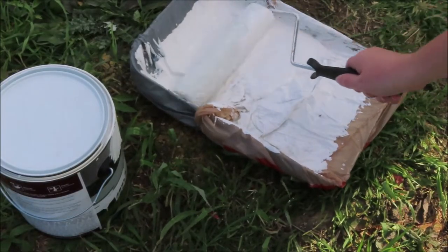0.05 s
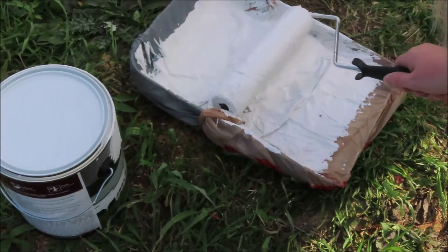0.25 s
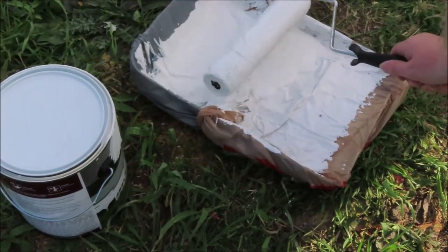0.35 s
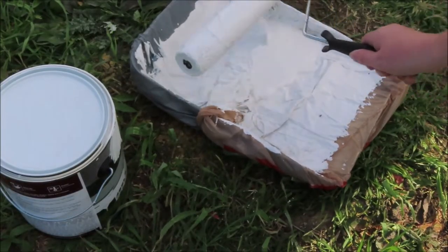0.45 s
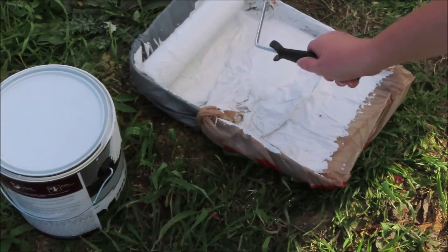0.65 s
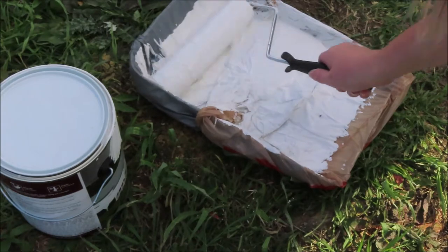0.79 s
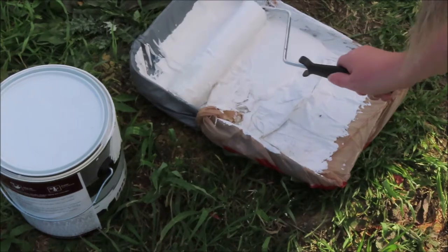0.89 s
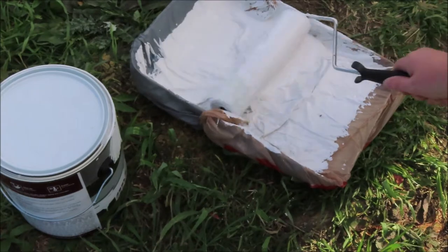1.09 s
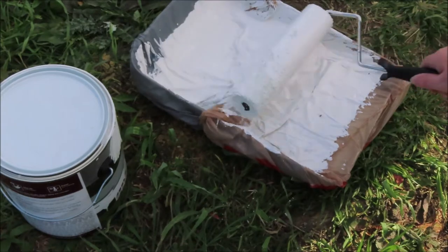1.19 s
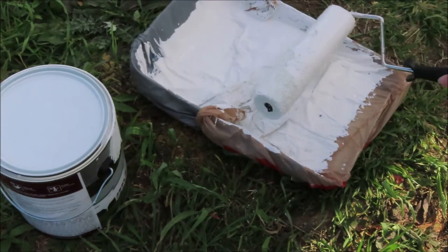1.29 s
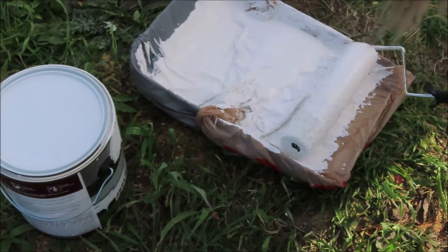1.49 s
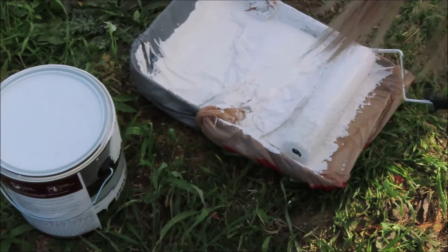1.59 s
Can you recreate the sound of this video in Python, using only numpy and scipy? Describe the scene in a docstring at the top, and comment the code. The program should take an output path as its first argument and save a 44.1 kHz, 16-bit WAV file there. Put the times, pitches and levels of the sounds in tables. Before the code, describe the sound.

A paint roller moves through wet paint in a tray, starting with a sticky sizzle and small snaps. Dull thuds come around 0.4 seconds as the sizzle drops away. The wet crackle and squelches return from 0.7 to 1.3 seconds, with the strongest bumps between 0.8 and 1.0. Another bump and squelch follow near 1.5. An uneven low rumble and faint distant outdoor roar lie underneath.

```python
"""On a lawn, about a metre away, a paint roller is worked back and forth in a lined tray of wet paint.
Sticky paint peels off the roller's fuzzy cover: tiny threads and bubbles break in a fine sizzle, with
squelches and a few snaps. The roller bumps over the tray's ribs, and its floor gives short, dull thuds.
Underneath lie a low rumble, a faint distant roar and a thin trill."""
import sys
import numpy as np
from scipy import signal
from scipy.fft import rfft, irfft, next_fast_len
from scipy.io import wavfile
from scipy.ndimage import uniform_filter1d

SR = 44100
rng = np.random.default_rng(int(sys.argv[2]) if len(sys.argv) > 2 else 0)


def persist_wave(psi):
    """Save psi, clipped to +-1, as 16-bit WAV."""
    counts = np.round(np.clip(psi, -1, 1) * 32767).astype(np.int16)
    wavfile.write(sys.argv[1], SR, np.atleast_2d(counts).T)


N = 72765

# how hard the paint peels off the roller (t/s, level/dB)
PEEL_LEVEL = [(0, -50), (0.054, -48), (0.066, -52.5), (0.21, -55.5), (0.26, -62), (0.31, -52.5),
              (0.35, -59), (0.41, -71), (0.64, -72), (0.672, -55.5), (0.694, -57), (0.72, -48.5),
              (0.735, -52), (0.762, -60.5), (0.822, -53), (0.885, -51), (0.9, -51), (1.04, -54.5),
              (1.152, -55), (1.212, -59.5), (1.262, -52), (1.303, -52), (1.333, -66.5), (1.52, -66),
              (1.552, -49.5), (1.585, -57.5), (1.63, -62)]
# treble added to or taken from the sizzle (t/s, level/dB)
SIZZLE_TREBLE = [(0, 0), (0.08, -5), (0.19, 7), (0.32, 2.5), (0.55, -1), (0.7, 7.5), (0.79, 5.5), (0.85, 5),
                 (0.98, -9), (1.044, -1), (1.056, 6), (1.16, 4.5), (1.29, 3.5), (1.45, -9), (1.56, -1.5),
                 (1.65, 0.5)]
# tone of the sizzle: how strong each frequency is (f/Hz, level/dB)
SIZZLE_TONE = [(300, -13.5), (600, -0.5), (1200, -1.5), (2100, -1), (2600, -2), (3050, -5.5), (4200, -6),
               (5200, -8.5), (7500, -13), (11500, -18), (15500, -26)]
# tone of the bright ticks of thicker threads (f/Hz, level/dB)
TICK_TONE = [(1000, -3), (8000, -8), (13000, -1), (15500, -7)]
# larger paint strings and bubbles snapping (t/s, level/dB)
SNAPS = [(0.0224, -36), (0.0328, -38), (0.0493, -32.5), (0.472, -52), (0.671, -41.5), (0.706, -41),
         (0.7194, -36), (0.735, -40), (0.7813, -42.5), (0.8022, -44), (0.8825, -38), (1.5786, -41.5)]
# tone of a snap (f/Hz, level/dB), and how fast it fades
SNAP_TONE, SNAP_FALL_S = [(400, 9), (1500, 9), (5000, 6), (11000, 1), (15500, -6)], 0.0016
# peaks of the squelches as the roller pulls out of the paint (t/s, level/dB)
SQUELCHES = [(0.05, -49.5), (0.721, -67), (0.826, -50), (0.886, -48), (1.288, -49.5), (1.556, -52.5)]
# stereo spread of the paint, which sits in the centre (f/Hz, level/dB)
PAINT_WIDTH = [(500, -37), (2000, -40), (4000, -17.5), (8000, -10.5), (13000, -6)]

# big bumps of the roller in the tray (t/s, level/dB, f/Hz)
BUMPS = [(0.081, -42, 146), (0.147, -44, 139), (0.2205, -39, 148), (0.236, -36, 159), (0.246, -35.5, 142),
         (0.257, -38, 175), (0.310, -40.5, 120), (0.389, -35, 174), (0.4045, -24.5, 220),
         (0.4177, -23.5, 223), (0.459, -29.5, 117), (0.469, -29, 171), (0.479, -36, 178),
         (0.499, -34.5, 121), (0.5655, -27.5, 162), (0.625, -29.5, 211), (0.633, -34, 96),
         (0.6583, -25, 148), (0.711, -28.5, 180), (0.7222, -32.5, 204), (0.778, -36.5, 226),
         (0.7915, -41, 310), (0.8238, -30.5, 255), (0.8395, -23, 318), (0.8495, -28.5, 278),
         (0.8579, -18, 296), (0.8732, -29, 334), (0.882, -25.5, 200), (0.9012, -24.5, 184),
         (0.9345, -31, 198), (0.9586, -29, 192), (0.968, -29.5, 322), (0.9988, -24.5, 226),
         (1.0255, -24.5, 187), (1.0313, -15, 299), (1.095, -35.5, 181), (1.1205, -38, 169),
         (1.422, -35.5, 198), (1.4732, -32, 198), (1.4877, -26, 256), (1.6394, -42.5, 202)]
# swings of the tray floor in a bump: body, main swing, upper ring (multiple of its pitch, level/dB)
FLOOR_SWINGS = [(0.55, -17.5), (0.998, 0), (1.8, -12)]
# strength of the small bumps between the big ones (t/s, level/dB)
JUDDER_LEVEL = [(0, -58), (0.19, -68), (0.225, -43.5), (0.29, -54), (0.36, -58), (0.41, -37), (0.44, -41.5),
                (0.52, -50), (0.68, -49), (0.8, -44), (0.86, -33.5), (0.92, -46.5), (1.03, -28.5),
                (1.06, -50.5), (1.2, -51.5), (1.31, -64), (1.5, -48.5), (1.65, -49.5)]
# notes the hollow tray rings at (f/Hz, level/dB), and how fast they fade
TRAY_NOTES, TRAY_RING_S = [(128, -12), (183, -16.5), (324, -12.5), (420, -8)], .014
# stereo spread of the bumps (f/Hz, level/dB)
BUMP_WIDTH = [(50, -42), (150, -44.5), (400, -17.5)]

# rise and fall of the deep rumble (t/s, level/dB)
RUMBLE_LEVEL = [(0, -55), (0.19, -71), (0.25, -47), (0.35, -52), (0.415, -35), (0.52, -44.5), (0.63, -41),
                (0.8, -66), (0.9, -38.5), (1.04, -54), (1.09, -57), (1.33, -73), (1.52, -55), (1.65, -59)]
# tone of the rumble (f/Hz, level/dB), and a shift of its whole level
RUMBLE_TONE, RUMBLE_DB = [(20, -25), (35, -7), (55, 0), (90, -1.5), (160, -15), (400, -70)], -2
# tone of the distant roar (f/Hz, level/dB)
ROAR_TONE = [(30, 0.5), (120, -2.5), (520, -5), (720, -1.5), (1000, -3), (1350, -6), (1700, -12.5),
             (2800, -19), (5200, -25.5), (9000, -34.5), (15000, -46)]
# rise and fall of the roar (t/s, level/dB)
ROAR_LEVEL = [(0, -53.5), (0.58, -52), (0.8, -52.5), (1.1, -55.5)]
# a hollow note in the roar, swelling and fading (t/s, level/dB)
HOLLOW_LEVEL = [(0, -68), (0.13, -62.5), (0.19, -54), (0.3, -52), (0.36, -60.5), (0.45, -54), (0.56, -70.5),
                (0.78, -51), (0.95, -70), (1.2, -66.5), (1.65, -74)]
# stereo spread of the roar, which is all around (f/Hz, level/dB)
ROAR_WIDTH = [(60, -46), (300, -26), (900, -20), (2000, -6.5), (4500, 3), (13000, 3.5)]

THREADS_PER_S, THREAD_SPREAD_DB = 9000, 2.5


def paint_sizzle(thread_db=-1.5, tick_db=-14, bubble_db=-6.5, hiss_db=-7.5, tuft_db=2):
    """Countless paint threads break as tiny clicks, mixed with brighter ticks, bubbles and hiss."""
    threads = gain(thread_db) * unit(shape_tone(clicks(THREADS_PER_S, THREAD_SPREAD_DB), SIZZLE_TONE))
    ticks = gain(tick_db) * unit(shape_tone(clicks(per_s=240, spread_db=3.5), TICK_TONE))
    sizzle = threads + ticks + gain(bubble_db) * bubbles() + gain(hiss_db) * noise(SIZZLE_TONE)
    treble = signal.sosfilt(signal.butter(1, 5600, "high", fs=SR, output="sos"), sizzle)
    sizzle += treble * (gain(curve(SIZZLE_TREBLE)) - 1)
    flutter_db = tuft_db * wobble(per_s=63)  # the fuzzy cover lets go tuft by tuft
    return sizzle * gain(curve(PEEL_LEVEL) + flutter_db)


def bubbles(per_s=450, low_hz=1684, high_hz=12700, ring_cycles=7.9):
    """Tiny bubbles burst, each ringing briefly at its own pitch; small, high ones are weaker."""
    t = np.arange(SR // 50) / SR
    out = np.zeros(N + SR)
    for when, pitch, chance in rng.random((int(per_s * N / SR), 3)):
        hz = low_hz * (high_hz / low_hz) ** pitch
        random_db = np.log(max(chance, np.exp(-3)))
        strength = gain(random_db) * (low_hz / hz) ** 0.21
        start = int(when * N)
        out[start:start + len(t)] += strength * np.exp(-t * hz / ring_cycles) * np.sin(2 * np.pi * hz * t)
    return unit(out[:N])


def paint_snaps():
    """Larger strings and bubbles snap, each with a wet crackle a few milliseconds long."""
    crackle = rng.standard_normal(N) * swells(SNAPS, rise_s=0.00061, fall_s=SNAP_FALL_S) / 2
    return shape_tone(crackle, SNAP_TONE)


def squelches():
    """Breaking threads make the wet gap under the roller ring, louder and louder until it lets go."""
    gap_ring = band(clicks(THREADS_PER_S, THREAD_SPREAD_DB), hz=2220, width_hz=1220)
    return gap_ring * swells(SQUELCHES, rise_s=0.02, fall_s=0.009)


def tray_bumps(top_hz=530, echo_s=0.0056):
    """The roller thuds over the tray's ribs; a faint echo from things nearby widens the sound."""
    knocks = thuds(BUMPS, FLOOR_SWINGS) + judder()
    low_pass = signal.butter(8, top_hz, fs=SR, output="sos")
    dull = signal.sosfiltfilt(low_pass, knocks + tray_ring(knocks))
    t = np.arange(SR // 20) / SR
    scatter = rng.standard_normal(len(t)) * np.exp(-t / echo_s)
    echo = signal.fftconvolve(dull, scatter / np.linalg.norm(scatter))[:N]
    return stereo(dull, echo, BUMP_WIDTH)


def thuds(bumps, swings, half_length_cycles=0.52, skew_radians=0.093):
    """At each bump the tray floor makes a slightly lopsided swing that stops almost at once."""
    out = np.zeros(N)
    for at, db, hz in bumps:
        centre = int(at * SR)
        span = np.arange(max(centre - SR // 20, 0), min(centre + SR // 20, N))
        for multiple, swing_db in swings:
            cycles = (span / SR - at) * hz * multiple
            hump = np.exp(-.5 * (cycles / half_length_cycles) ** 2)
            out[span] -= gain(db + swing_db) * hump * np.cos(2 * np.pi * cycles - skew_radians)
    return out


def judder(per_s=280, middle_hz=170, spread_octaves=0.66, octaves_per_db=0.11):
    """The roller shakes the tray with many small bumps as it rolls; harder shaking sounds higher."""
    when, size, pitch = rng.random((int(per_s * N / SR), 3)).T
    force_db = curve(JUDDER_LEVEL)
    extra_db = force_db[(when * N).astype(int)] - np.median(force_db)
    octaves = spread_octaves * (2 * pitch - 1) + octaves_per_db * extra_db
    bumps = zip(when * N / SR, 20 * np.log10(size), middle_hz * 2 ** octaves)
    shaking = thuds(bumps, swings=[(1, 0)])
    return unit(shaking - shaking.mean()) * gain(force_db)


def tray_ring(knocks):
    """The hollow tray rings on briefly after every knock."""
    t = np.arange(SR // 10) / SR
    notes = sum(gain(db) * np.cos(2 * np.pi * hz * t) for hz, db in TRAY_NOTES)
    ring = notes * np.exp(-t / TRAY_RING_S)
    scale = 2 / (TRAY_RING_S * SR)  # a note at 0 dB rings as strongly as it is pushed
    return signal.fftconvolve(knocks, ring * scale)[:N]


def rumble():
    """Wind or handling makes a deep, uneven rumble."""
    return noise(RUMBLE_TONE) * gain(curve(RUMBLE_LEVEL) + RUMBLE_DB)


def distant_roar():
    """A faint roar comes from all around, with a hollow note that swells and fades."""
    roar = stereo(noise(ROAR_TONE), noise(ROAR_TONE), ROAR_WIDTH)
    middle, side = (band(rng.standard_normal(N), hz=882, width_hz=172) for _ in range(2))
    hollow = stereo(middle, side, ROAR_WIDTH)
    return roar * gain(curve(ROAR_LEVEL)) + hollow * gain(curve(HOLLOW_LEVEL))


def trill(level_db=-77, flutter_db=5.5):
    """A faint, thin trill flutters quickly, perhaps an insect."""
    thin_hiss = band(rng.standard_normal(N), hz=4770, width_hz=370)
    return thin_hiss * gain(level_db + flutter_db * wobble(per_s=87))


def gain(db):
    """Turn decibels into a number to multiply by."""
    return 10 ** (np.asarray(db) / 20)


def unit(x):
    """Scale a sound so that its average power is 1."""
    return x / np.sqrt(np.mean(x ** 2))


def curve(rows):
    """Join (time, value) rows with straight lines."""
    return np.interp(np.arange(N) / SR, *np.array(rows).T)


def swells(rows, rise_s, fall_s):
    """Loudness that builds up to each (t/s, level/dB) row and dies away after it."""
    t = np.arange(N) / SR
    return sum(gain(db) * np.exp(-np.maximum((at - t) / rise_s, (t - at) / fall_s)) for at, db in rows)


def wobble(per_s):
    """Glide from one random value to the next, per_s times a second."""
    hold = int(SR / per_s)
    steps = np.repeat(rng.standard_normal(N // hold + 1), hold)
    return 0.84 * uniform_filter1d(steps, hold)[:N]


def clicks(per_s, spread_db):
    """Random clicks, mostly small and a few large."""
    happens = rng.random(N) < per_s / SR
    size = np.minimum(rng.exponential(size=N), 5)
    return happens * gain(spread_db * size) * rng.choice([-1, 1], N)


def noise(tone):
    """Noise with the given tone, at power 1."""
    return unit(shape_tone(rng.standard_normal(N), tone))


def band(x, hz, width_hz):
    """Keep the frequencies around hz, at power 1."""
    edges = [hz - width_hz / 2, hz + width_hz / 2]
    return unit(signal.sosfilt(signal.butter(2, edges, "band", fs=SR, output="sos"), x))


def shape_tone(x, tone):
    """Turn frequencies up or down to follow (f/Hz, level/dB) rows."""
    size = 2 * next_fast_len(N)
    hz, db = np.array(tone).T
    all_hz = np.arange(size // 2 + 1) * SR / size
    gains = gain(np.interp(np.log(all_hz + 1), np.log(hz), db))
    # fold the filter forward in time, so nothing rings before the click that causes it
    folded = irfft(np.log(gains))
    folded[1:size // 2] *= 2
    folded[size // 2 + 1:] = 0
    return irfft(rfft(x, size) * np.exp(rfft(folded)))[:N]


def stereo(middle, side, width):
    """Shape the side sound by the width table, then add it on the left and subtract it on the right."""
    return middle + shape_tone(side, width) * np.array([[1], [-1]])


def scene():
    """Paint, tray and garden together."""
    middle, side = (paint_sizzle() + paint_snaps() for _ in range(2))
    paint = stereo(middle, side, PAINT_WIDTH) + squelches()
    return paint + tray_bumps() + rumble() + distant_roar() + trill()


def record(dry):
    """Cut away the highest treble, above 15750 Hz."""
    return signal.sosfilt(signal.ellip(10, .2, 80, 15750, fs=SR, output="sos"), dry)


dry = scene()
out = record(dry)
persist_wave(out)
```